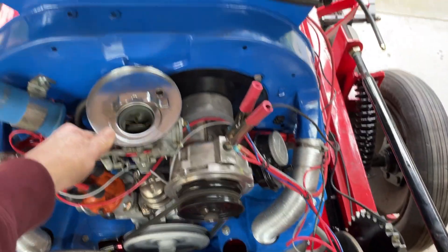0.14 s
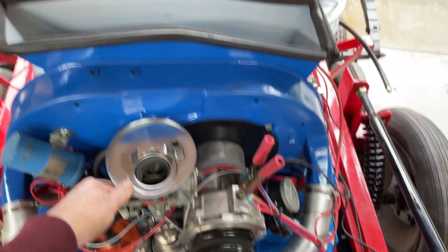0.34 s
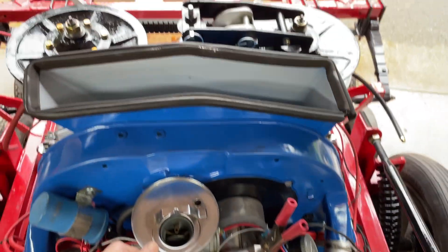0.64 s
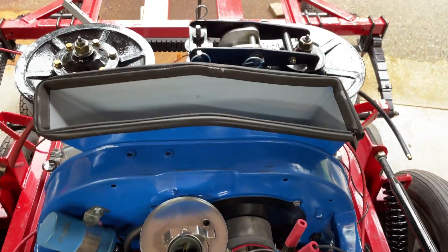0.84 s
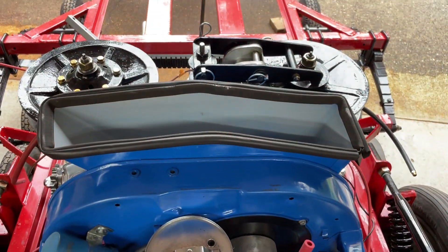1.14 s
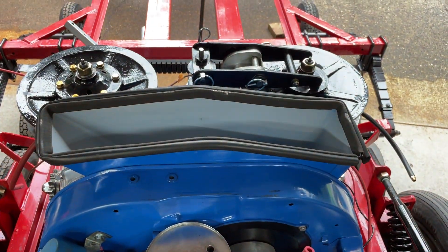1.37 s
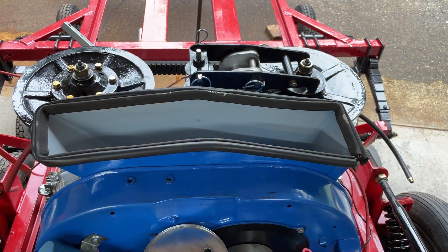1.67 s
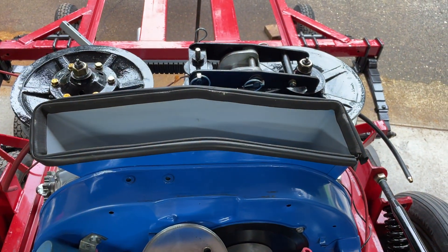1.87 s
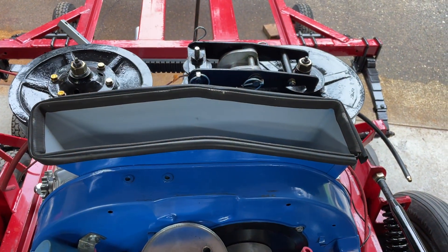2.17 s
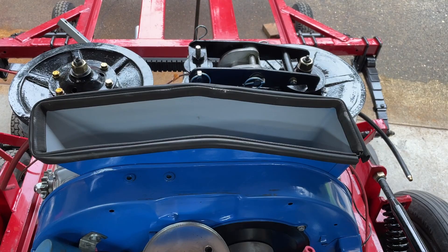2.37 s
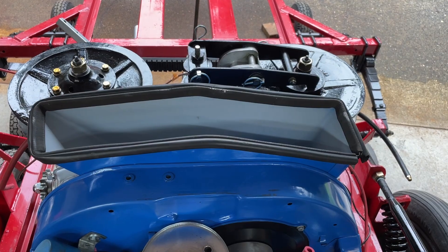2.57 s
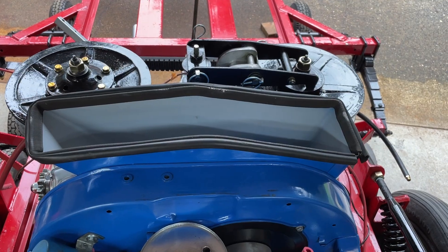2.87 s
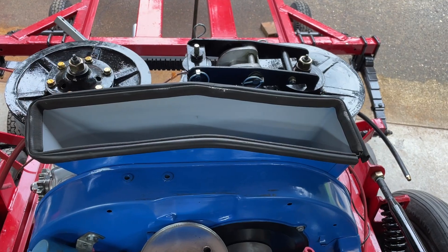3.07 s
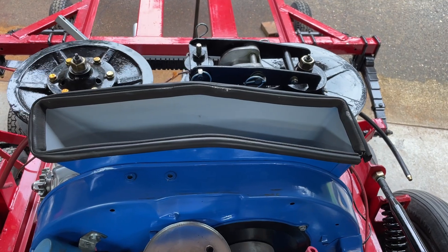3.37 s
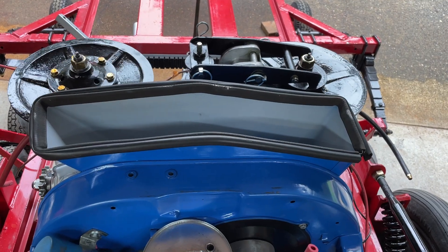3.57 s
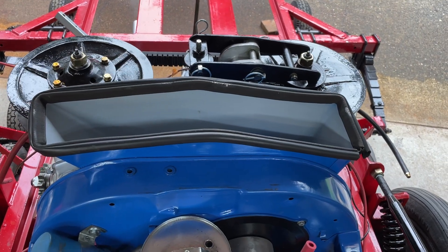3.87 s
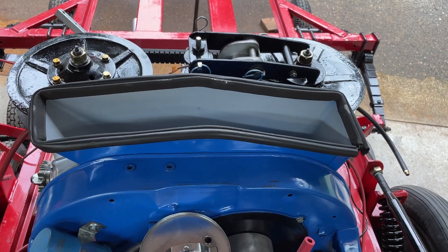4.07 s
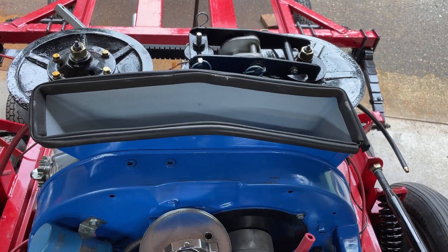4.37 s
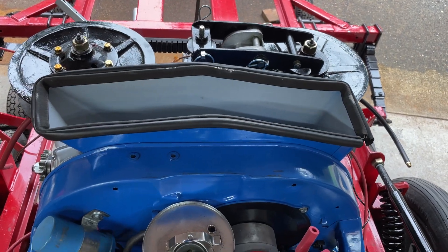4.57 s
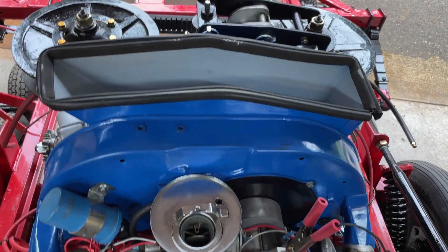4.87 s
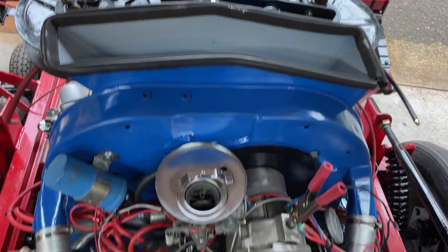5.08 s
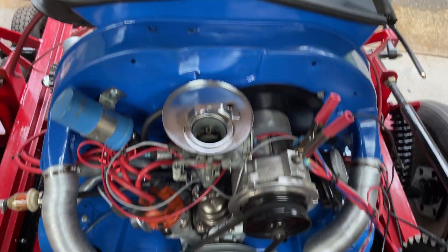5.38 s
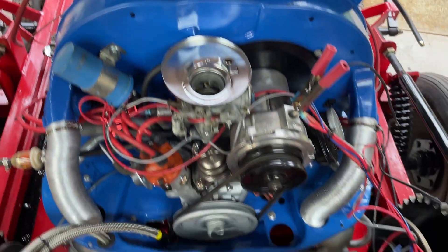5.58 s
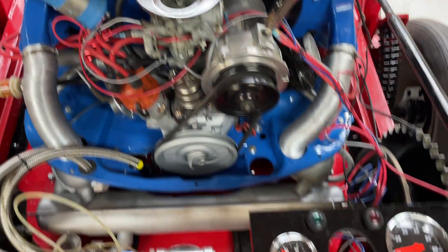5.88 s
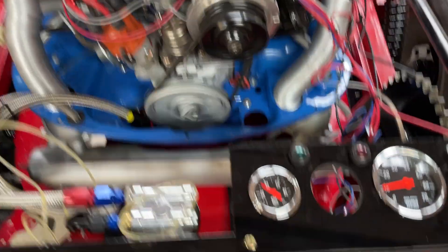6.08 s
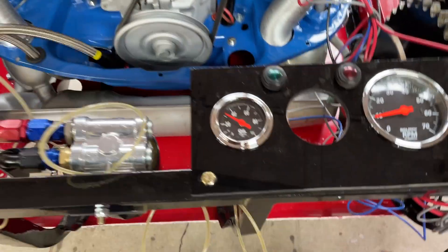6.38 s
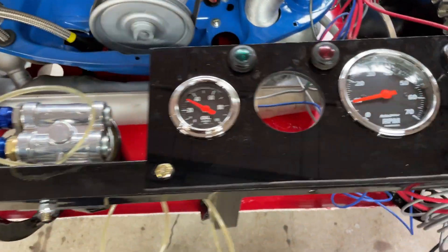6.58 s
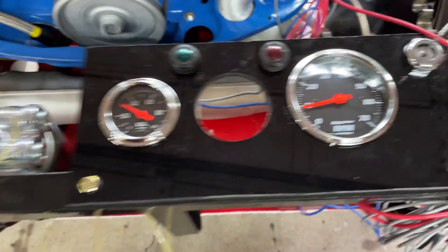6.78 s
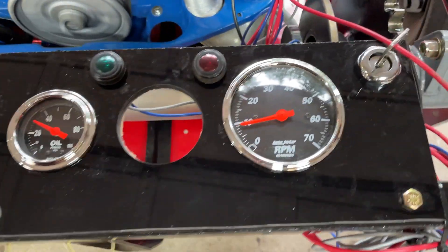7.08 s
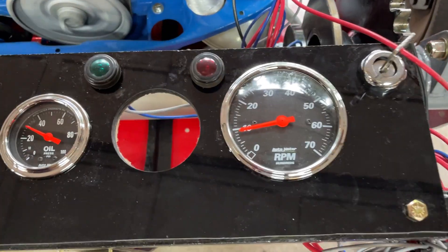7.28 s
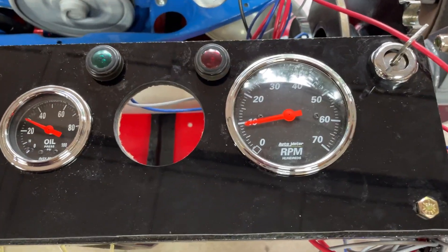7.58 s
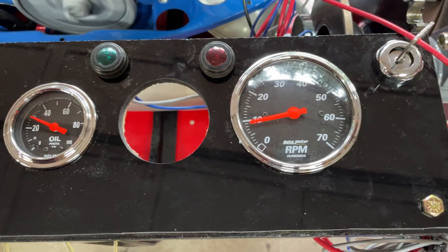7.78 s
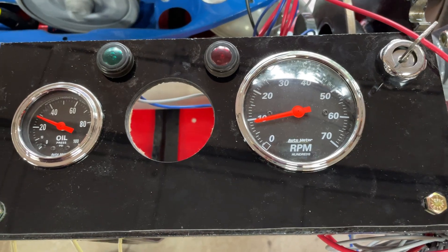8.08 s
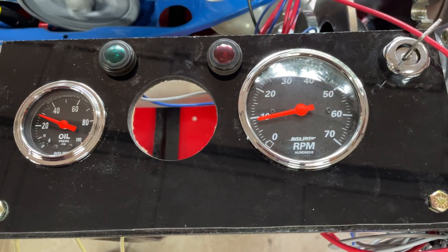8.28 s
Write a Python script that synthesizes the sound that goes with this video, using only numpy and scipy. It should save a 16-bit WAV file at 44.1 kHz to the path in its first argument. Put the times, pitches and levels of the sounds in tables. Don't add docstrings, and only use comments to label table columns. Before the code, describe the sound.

From 0 to about 1.2 s an air-cooled flat-four engine holds a fast idle close to a phone: a low buzzing exhaust drone of nearly 58 firings a second, broad fan roar, and bright, hissing valve gear and intake noise. Around 1.2 s the throttle is pulled and the pitch climbs steadily, with fan and exhaust strong, peaking near 3.2 s. At 3.3 s it is let go; a brief low exhaust swell follows, then pitch and loudness slide down over two seconds. By 5 to 6 s it is a much quieter, slow, uneven putter near 28 firings a second, limping slightly. From about 5.9 s the phone swings behind a panel: the fan fades, soft low air puffs hit the microphone until 7.2 s, momentarily hollowing the middle. Idle sags near 6.6 s, picks up by 7.4 s and continues to the end at 8.4 s, with one last faint puff.

```python
import sys
import numpy as np
from scipy import signal
from scipy.fft import rfft, irfft, next_fast_len
from scipy.io import wavfile
from scipy.ndimage import uniform_filter1d

SR = 44100
rng = np.random.default_rng(int(sys.argv[2]) if len(sys.argv) > 2 else 0)


def persist_wave(psi):
    counts = np.round(np.clip(psi, -1, 1) * 32767).astype(np.int16)
    wavfile.write(sys.argv[1], SR, np.atleast_2d(counts).T)


def invert_db(x):
    u = np.asarray(x, float) / 20
    return 10 ** u


N = 371763
TIME = np.arange(N) / SR
SIZE = next_fast_len(N)
BINS = np.fft.rfftfreq(SIZE, 1 / SR) + 1e-9

# f/Hz, left minus right of the fan level/dB,
# likeness of the ports facing the engine [0-1], likeness behind the panel [0-1]
PORT_BALANCE = [(60, 0, 1, 1), (130, 0, 1, 1), (200, 1.0, .998, .93), (380, 2.7, .99, .72),
                (700, 4.3, .97, .25), (1300, 4.8, .96, .2), (1900, 1, .96, .45), (2600, -.3, .86, .45),
                (4400, -.4, .7, .6), (6000, 0, .82, .8), (7200, 0, .975, .96), (10000, 0, .94, .92),
                (15000, 0, .945, .92)]


def unit(x):
    return x / np.sqrt(np.mean(x ** 2))


def follow(table):
    return np.interp(TIME, *np.transpose(table))


def along(table, column):
    table = np.array(table, float)
    return np.interp(np.log(BINS), np.log(table[:, 0] + 1), table[:, column])


def filtered(x, gain):
    return irfft(rfft(x, SIZE) * gain, SIZE)[..., :N]


def ring(x, modes):
    gain = 0
    for k, (hz, width_hz, db) in enumerate(modes):
        gain = gain + (-1) ** k * invert_db(db) / (1 + 1j * (BINS - hz ** 2 / BINS) / width_hz) ** 2
    return filtered(x, gain)


def ripple(depth_db, per_octave):
    knots = rng.standard_normal(300)
    return depth_db * np.interp(np.log2(BINS / 30) * per_octave, np.arange(300), knots)


def steady(x, span_s):
    k = int(span_s * SR)
    power = uniform_filter1d(uniform_filter1d(x ** 2, k), k)
    return x / np.sqrt(power + 1e-12)


def walk(rate):
    held = np.repeat(rng.standard_normal(int(rate * N / SR) + 2), 16)
    smooth = uniform_filter1d(uniform_filter1d(held, size=16), size=16)
    return 1.3 * np.interp(TIME * rate * 16, np.arange(len(held)), smooth)


def bell(s, length):
    return np.exp(-abs(2 * (TIME - s) / length) ** 3)


def at_ports(colour_db, likeness, balance_db, swell):
    # f/Hz, left leads by [radians]
    port_phase = [(0, 0), (2700, .2), (4200, .8), (4900, .1), (5500, .6), (6900, 2.6), (7600, 3.14),
                  (8300, 3.4), (10300, 5.9), (11000, 6.28), (11700, 6.6), (13100, 8.6), (13800, 9.4),
                  (14600, 9.45), (15800, 10.5)]
    common, left, right = rfft(rng.standard_normal((3, SIZE))) * invert_db(colour_db)
    turn = np.exp(.5j * np.interp(BINS, *np.transpose(port_phase))) * invert_db(balance_db / 2)
    shared = np.sqrt(likeness) * common * [turn, 1 / turn]
    pair = shared + np.sqrt(1 - likeness) * np.array([left, right])
    place = np.clip(np.log2(BINS / 250) / 1.4, 0, 4)
    total = 0
    for k in range(5):
        band = irfft(pair * np.clip(1 - abs(place - k), 0, 1), SIZE)[:, :N]
        total = total + band * swell(250 * 2 ** (1.4 * k))
    return unit(total)


def puffs():
    # t/s, length [s], level/dB, dip of the middle band [dB]
    gusts = [
        (5.94, .03, -41, -2),
        (6.19, .05, -35, -10),
        (6.29, .11, -29, -30),
        (6.6, .1, -31, -15),
        (6.76, .03, -41, -3),
        (7.03, .07, -31, -9),
        (7.13, .06, -32, -16),
        (8.22, .03, -36, -2),
    ]
    # f/Hz, level/dB per Hz
    wind_colour = [(30, -21), (90, -10), (200, -12), (500, -20), (1500, -28), (4000, -56)]
    bells = np.array([bell(s, length) for s, length, _, _ in gusts])
    air = unit(filtered(rng.standard_normal(N), invert_db(along(wind_colour, 1))))
    rumble = air * invert_db(7.8 * walk(40))
    _, _, level_db, dip_db = np.array(gusts).T
    return rumble * (invert_db(level_db) @ bells), dip_db @ bells


def valve_gear(turns, level_db):
    # f/Hz, facing the engine level/dB per Hz, behind the gauge panel level/dB per Hz
    gear_colour = [(60, -38, -10), (197, 4, -1.5), (440, 3, -6), (803, 5, 0.5), (830, 0.5, -7),
                   (1200, 0.5, -8), (1840, -5, -10), (2500, -25, -12.5), (2490, -6, -17), (4800, -21, -22),
                   (7600, -12.5, -20), (8500, -14, -23), (11900, -20.5, -31), (16000, -18.5, -26)]
    swing_s = (5.85, 6.32)
    cycle_db = 0.7 * np.cos(np.pi / 2 * turns) + 1.0 * np.cos(np.pi * turns + 1.3)
    firing_db = 6.5 * np.exp(-(turns % 1) / 0.43)
    beat_db = cycle_db + firing_db + 0.87 * walk(45)

    def swell(hz):
        return invert_db(beat_db * min(hz / 8000, 1) + 0.92 * walk(25))

    balance_db = along(PORT_BALANCE, 1)
    facing_db = along(gear_colour, 1) + ripple(2.4, 30)
    facing = at_ports(facing_db, along(PORT_BALANCE, 2) ** 2, 1.3 * balance_db, swell)
    hidden_db = along(gear_colour, 2) + ripple(2.1, 30)
    hidden = at_ports(hidden_db, along(PORT_BALANCE, 3), -.25 * balance_db, swell)
    behind = np.interp(TIME, swing_s, (0, 1))
    return invert_db(level_db) * (np.sqrt(1 - behind) * facing + np.sqrt(behind) * hidden * invert_db(3.0))


def fan(turns, level_db):
    # f/Hz, level/dB per Hz
    blade_colour = [(40, -40), (110, -24.5), (300, -1.5), (900, -7.5), (1800, -14), (2900, -13),
                    (5500, -16.5), (7500, -18.5), (11000, -27.5), (16000, -27.5)]
    # f/Hz, width [Hz], level/dB
    housing = [(428, 110, -5), (557, 200, 3.5), (651, 40, -23.5), (700, 115, 3), (956, 67, -6),
               (1120, 320, 2.5), (1940, 350, -4), (2280, 790, 6), (3280, 240, 2), (4550, 480, -3)]
    colour_db = along(blade_colour, 1) + ripple(1.16, 40)
    for hz, width_hz, db in housing:
        colour_db = colour_db + db / (1 + (2 * (BINS - hz) / width_hz) ** 2)
    shake_db = 2.0 * np.exp(-(turns % 1) / 0.28) + 0.38 * np.cos(np.pi * turns)
    gust_db = .5 * walk(8.3) + shake_db

    def swell(hz):
        return invert_db(gust_db + 0.57 * walk(18))

    return invert_db(level_db) * at_ports(colour_db, along(PORT_BALANCE, 2), along(PORT_BALANCE, 1), swell)


def speed():
    # t/s, firings a second [1/s]
    rev = [
        (0.0, 57.6),
        (1.17, 57.4),
        (1.5, 64.0),
        (1.7, 66.3),
        (2.1, 69.0),
        (2.5, 73.7),
        (2.9, 80.7),
        (3.15, 84.3),
        (3.32, 84.0),
    ]
    # t/s, firings a second [1/s]
    idle = [
        (3.32, 28.6),
        (5.9, 27.8),
        (6.65, 26.5),
        (7.4, 29.4),
        (7.8, 28.6),
        (8.43, 29.1),
    ]
    coast_s = 1.02
    release_s, top = rev[-1]
    coast = follow(idle) + (top - idle[0][1]) * np.exp((release_s - TIME) / coast_s)
    return np.where(TIME < release_s, follow(rev), coast)


def boom_level(turns, hz, effort_db):
    # multiple of the firing rate [1], level/dB
    swells = [(1, -30), (1.25, -27), (1.499, -14.5), (2, -13.5), (2.5, -16), (3, -11)]
    swell_hz, width_hz, floor_db = 92.54, 5.44, -30.5
    earlier_hz = np.interp(TIME - 0.075, TIME, hz)
    power = invert_db(2 * floor_db)
    for k, db in swells:
        power = power + invert_db(2 * db) / (1 + (2 * (k * earlier_hz - swell_hz) / width_hz) ** 2)
    dip_s, dip_db, sharpness = 7.68, -4, 3.6
    cycle = np.pi / 2 * (turns - np.interp(dip_s, TIME, turns))
    limp_db = dip_db * np.exp(sharpness * (np.cos(cycle) - 1)) * np.clip(31.5 - hz, 0, 1)
    return 10 * np.log10(power) + 0.53 * (effort_db + 18) + limp_db


def exhaust(turns, hz, boom_db, pipe_db):
    # strength level/dB, extra delay of the header pipe [ms]
    cylinders = [
        (2.5, 0.74),
        (-7, 3),
        (1, 0.56),
        (-5.5, 1.8),
    ]
    # f/Hz, width [Hz], level/dB
    silencer = [(90.8, 9, 8)]
    # f/Hz, width [Hz], level/dB
    body = [(78, 41.4, -15.5), (114, 14, -35)]
    # f/Hz, width [Hz], level/dB
    tail_pipe = [(128, 30, -11), (181, 30, 0), (228, 26, 1), (272, 26, -4), (303, 30, 0)]
    # multiple of the four-stroke cycle [1], level/dB
    multiples = [(8, -14), (9, -6), (10, -3), (11, 1), (12, 2), (13, -9), (14, -11), (15, -4), (16, -16),
                 (17, -14), (18, -10), (19, -12), (20, -12), (22, -10), (24, -1), (28, -13), (30, -14),
                 (36, -3)]
    # t/s, opening [0-1]
    throttle = [
        (0, 0.6),
        (3.3, 0.47),
        (3.6, 0.16),
        (6.6, 0.05),
        (7.2, 0.8),
        (8.43, 1),
    ]

    count = np.arange(1, int(turns[-1]))
    late, uneven = rng.standard_normal((len(count), 2)).T
    strength_db, delay_ms = np.array(cylinders)[count % 4].T
    when = np.interp(count, turns, TIME) + (delay_ms + 0.19 * late) / 1000
    pulses = np.zeros(N)
    np.add.at(pulses, np.clip((when * SR).astype(int), 0, N - 1), invert_db(strength_db + 0.28 * uneven))
    gas = steady(pulses, 0.9) + 0.26 * rng.standard_normal(N)
    low = ring(gas, silencer) + ring(gas, body) * invert_db(4.1 * np.log2(hz / 16.2))

    crank = np.pi / 2 * turns + .015 * walk(8)
    song = 0
    for k, db in multiples:
        song = song + invert_db(db + 1.6 * walk(4)) * np.sin(k * crank + k * k)
    blow = follow(throttle) * song + invert_db(12) * rng.standard_normal(N)
    pipe = steady(ring(blow, tail_pipe), 0.13)
    return invert_db(boom_db) * steady(low, .12), invert_db(pipe_db - 3.5) * pipe


def scene():
    # t/s, level/dB
    effort = [(0, -19.5), (0.8, -21.5), (1.1, -21.5), (1.5, -17), (2.35, -18), (3.0, -16), (3.33, -18),
              (3.64, -23.5), (3.9, -26), (4.25, -33), (4.5, -29.5), (5.45, -34), (5.68, -32), (6.1, -35),
              (6.7, -37), (7.3, -34), (8.43, -32.5)]
    # t/s, length [s], silencer level/dB, tail pipe level/dB
    lumps = [(0.5, 3, 0.1, 4), (2.3, 1.9, 1.2, -4), (3.0, 0.27, -1, 4.5), (3.282, 0.22, 0, -5.5),
             (3.472, 0.27, 6.5, 0), (3.75, 0.15, -2, -4.5), (3.904, 0.21, -7.5, -1.5),
             (4.645, 0.091, 2.5, 9), (4.72, 0.046, -3, 0.1), (4.791, .08, 10, -3), (4.947, 0.12, 0, 2),
             (5.364, .15, 3, 1.5), (5.717, 0.048, -1, -1), (5.806, 0.059, -6, 2.5), (6.543, 0.17, -3.5, -9),
             (6.65, 0.087, 2, 0), (6.783, .1, 0, -4), (6.92, 0.16, 5, 4), (7.107, 0.19, -1.5, -2),
             (7.44, 0.12, 0, 6), (8.203, 0.17, 3.5, 2.5)]
    # t/s, level/dB
    facing = [
        (0, -22.5),
        (1.6, -23),
        (2.4, -27.5),
        (3.3, -29),
        (3.7, -31.5),
        (4.0, -31.5),
        (6.2, -31.5),
        (6.8, -32.5),
        (7.3, -31.5),
        (8.43, -30.5),
    ]
    hz = speed()
    turns = np.cumsum(hz) / SR
    effort_db = follow(effort)
    bells = [bell(s, length) for s, length, _, _ in lumps]
    boom_lump_db, pipe_lump_db = np.array(lumps)[:, 2:].T @ bells
    boom_db = boom_level(turns, hz, effort_db) + boom_lump_db
    pipe_db = -21 + 0.65 * (effort_db + 18.5) + pipe_lump_db

    wind, dip_db = puffs()
    fan_db = effort_db - 21 * np.interp(TIME, (6.2, 6.8), (0, 1))
    boom, pipe = exhaust(turns, hz, boom_db, pipe_db)
    opposite = np.array([[1], [-1]])
    roar = valve_gear(turns, follow(facing)) + fan(turns, fan_db) + pipe * invert_db(.6 * opposite)
    middle = filtered(roar.mean(0), 1 / (1 + (200 / BINS) ** 12) / (1 + (BINS / 1000) ** 4))
    lean = 0.027 * invert_db(5.7 * walk(6)) * np.interp(TIME, (5.9, 6.0), (0, 1))
    return boom * (1 + lean * opposite) + roar - (1 - invert_db(dip_db)) * middle + wind * opposite


def low_pass(x):
    return signal.sosfilt(signal.butter(12, 15730, fs=SR, output="sos"), x)


def record(dry):
    high_pass = signal.butter(2, 45, "high", fs=SR, output="sos")
    mix = signal.sosfilt(high_pass, dry)
    return low_pass(mix)


dry = scene()
out = record(dry)
persist_wave(out)
```